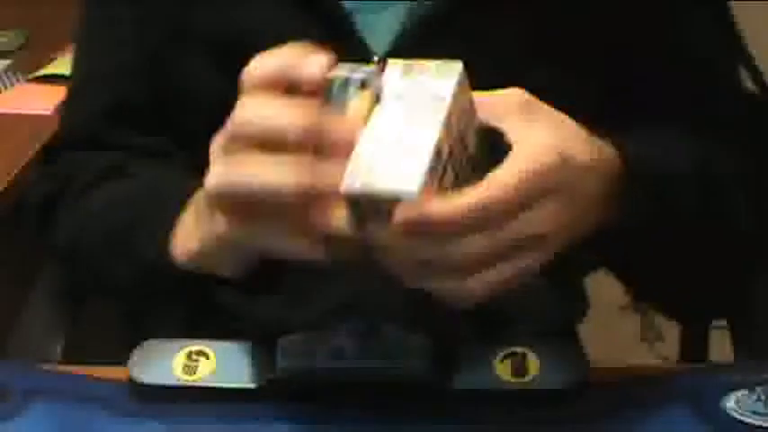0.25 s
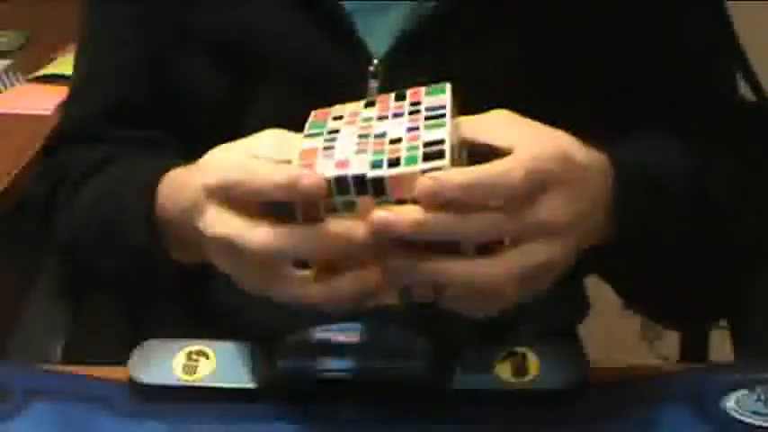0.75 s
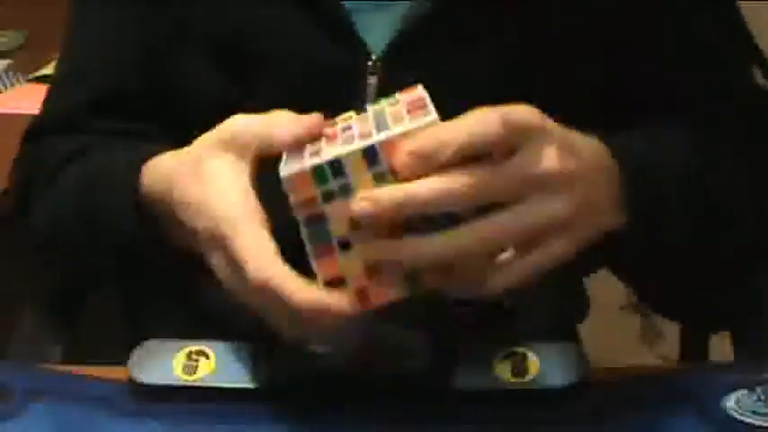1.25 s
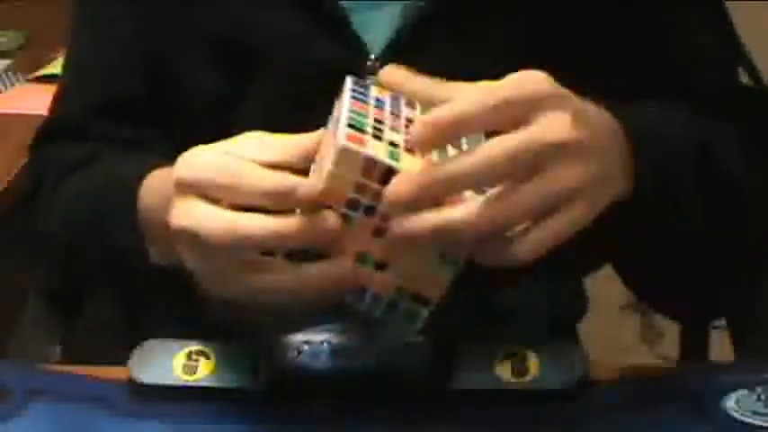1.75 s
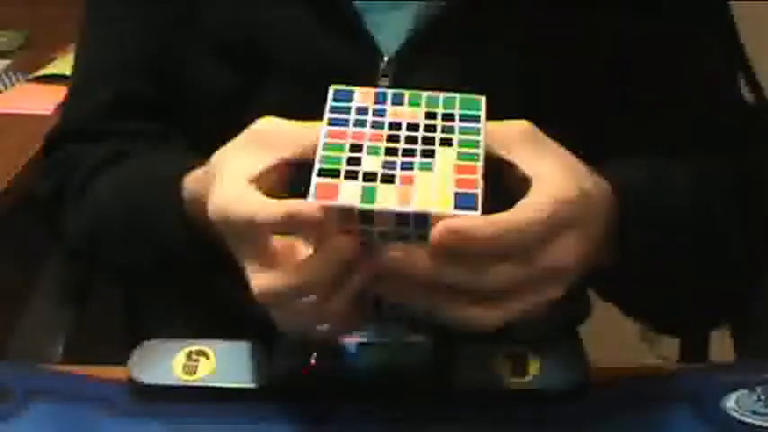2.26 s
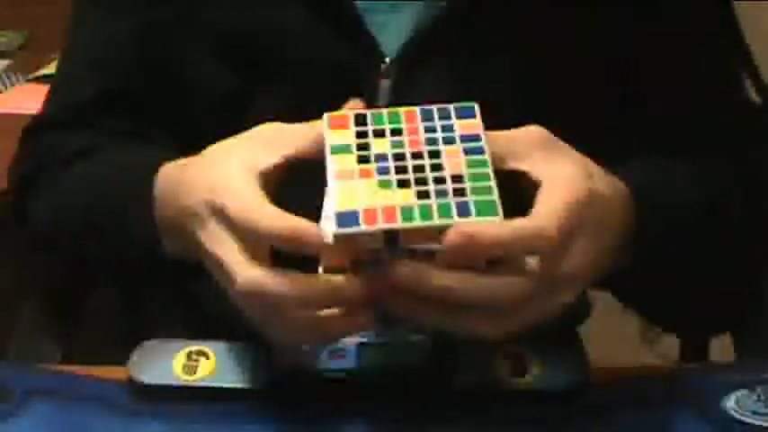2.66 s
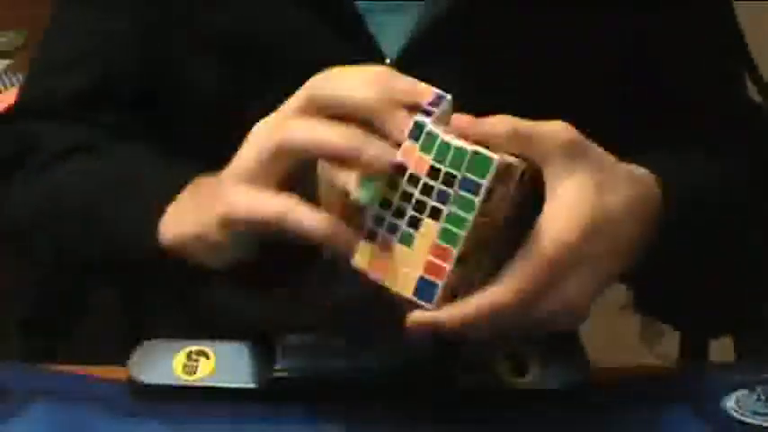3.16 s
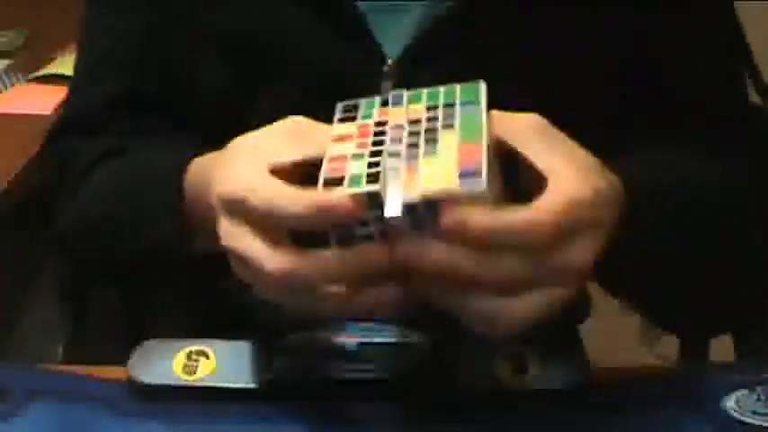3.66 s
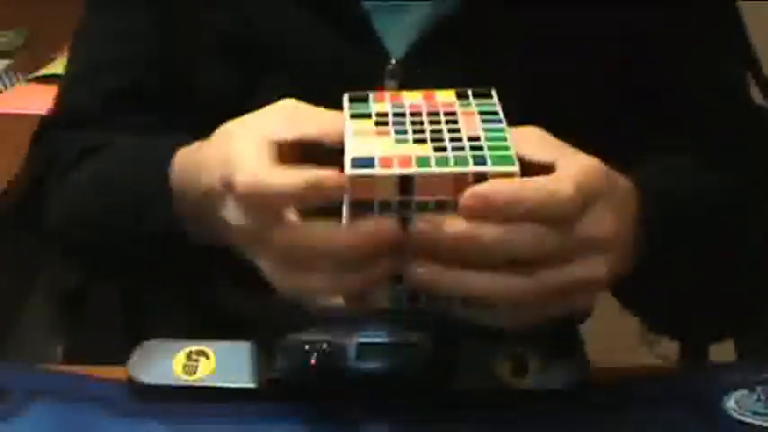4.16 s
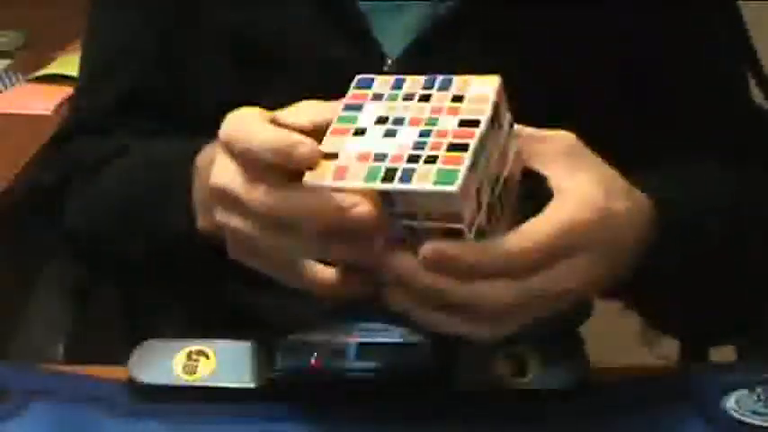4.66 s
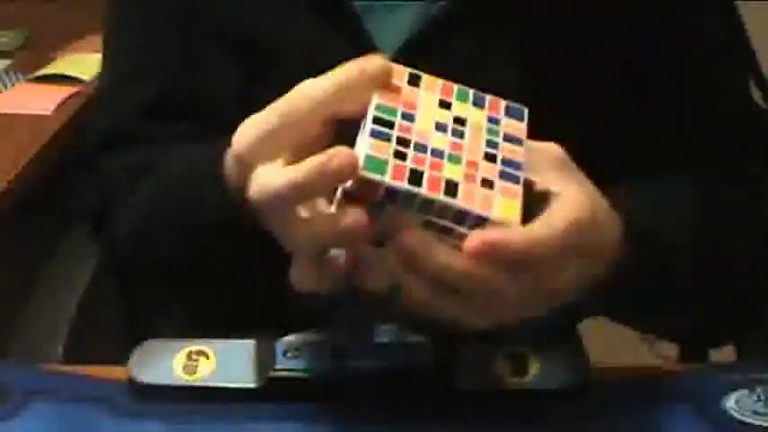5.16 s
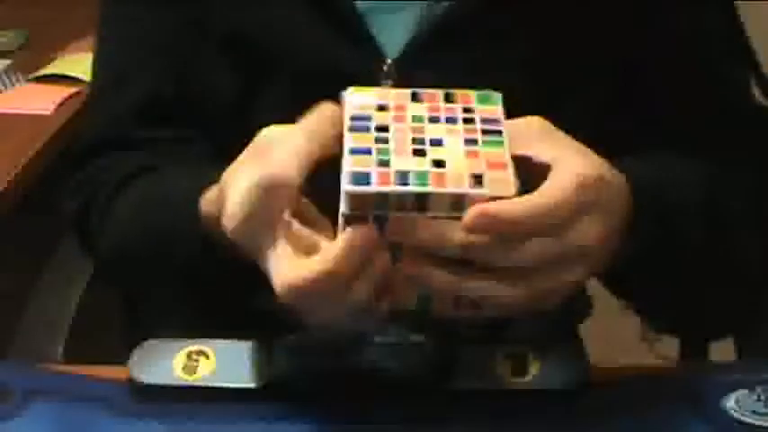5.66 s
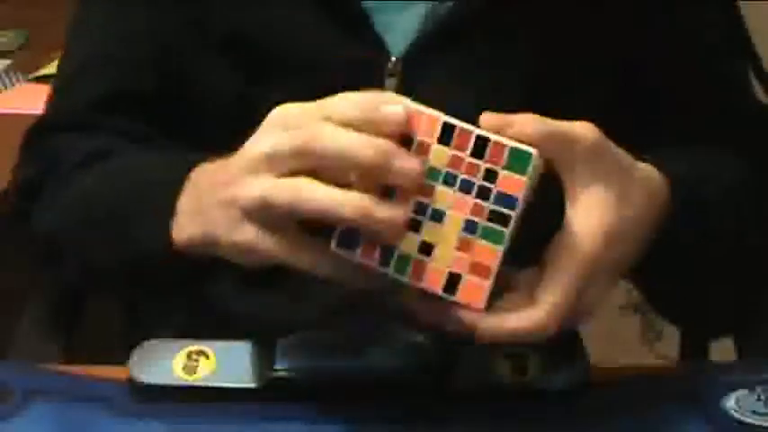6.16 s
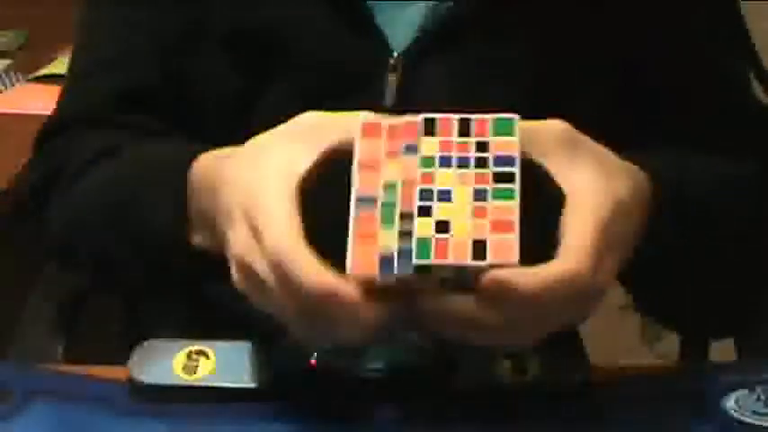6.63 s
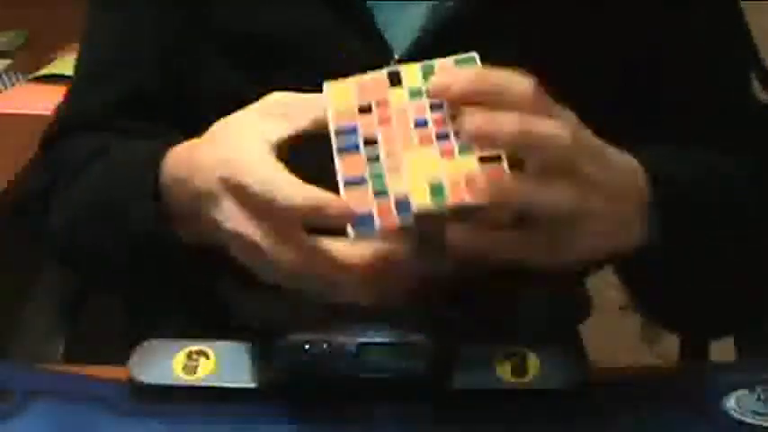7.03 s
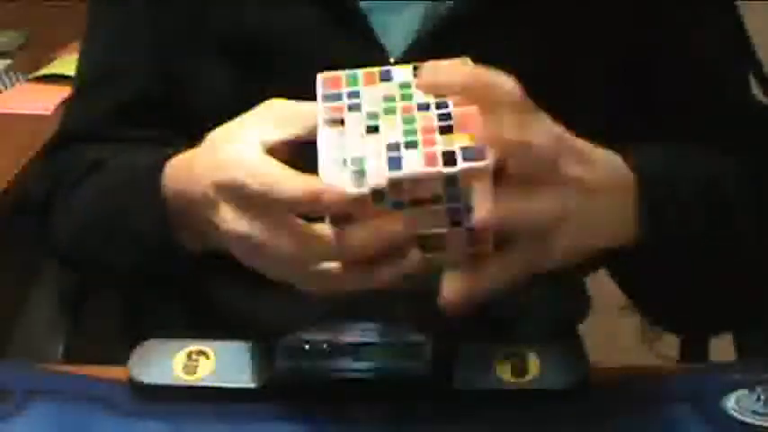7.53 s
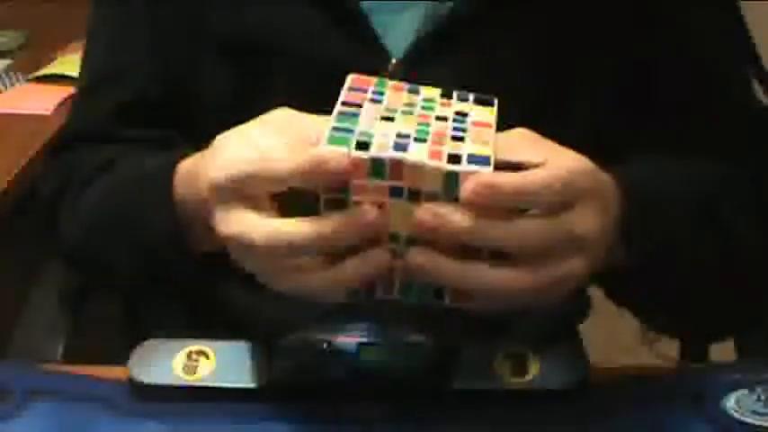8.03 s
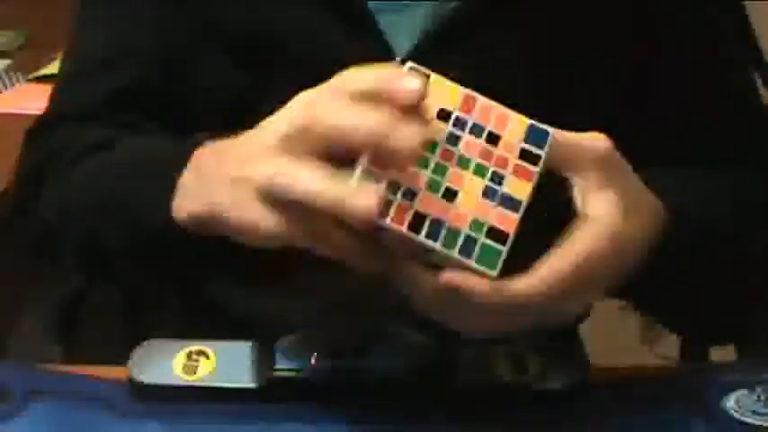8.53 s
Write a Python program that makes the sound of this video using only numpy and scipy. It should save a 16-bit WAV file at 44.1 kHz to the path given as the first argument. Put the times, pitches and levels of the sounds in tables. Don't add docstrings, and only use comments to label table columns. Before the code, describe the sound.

A quiet, softly furnished room, heard by a close small stereo microphone with steady hiss and faint mains hum. Soft, low footsteps thud through the floor from the start, fading over about five seconds. A large hollow plastic puzzle cube ticks faintly, then a loud, bright crunching turn snaps at 0.4 s. Lighter clicks follow at 0.6, 0.75 and 1.1, with sharp cracks at 1.45 and 1.65. After small nudges, turns clack at 2.5 and 2.9, then a dense run rattles from 3.2 to 3.85, strongest near 3.4. More follow at 4.05-4.5, with a crisp burst around 4.4. After a pause, hollow clacks come at 5.2, 5.55 and 5.8, then 6.35-6.75. From 6.8 to 8.4 only tiny ticks and faint creaks remain. Two last short, snappy turns sound at 8.47 and 8.75, dry and close.

```python
import sys
import numpy as np
from scipy import signal
from scipy.fft import rfft, irfft, next_fast_len
from scipy.io import wavfile
from scipy.ndimage import uniform_filter1d

SR = 44100
rng = np.random.default_rng(int(sys.argv[2]) if len(sys.argv) > 2 else 0)


def how_loud(loudness_db):
    steps = np.asarray(loudness_db, float) / 20
    return 10 ** steps


def wav_record(signal):
    frames = np.transpose(np.atleast_2d(signal))
    bounded = np.clip(frames, -1, 1)
    quanta = np.round(bounded * 32767).astype(np.int16)
    wavfile.write(sys.argv[1], SR, quanta)


N = 387638

# frequency [Hz], level [dB per Hz].
PLASTIC = [(650, -46), (1100, -17), (1740, 0), (1880, -4), (2230, -5.5), (3610, -1.5), (7720, -3),
           (10800, -2.5), (13400, -1), (16000, -27)]
# frequency [Hz], width [Hz], level [dB].
HOLLOW = [(400, 64, -22), (607, 63, -0.5), (708, 116, 6), (825, 33, -1)]
GRIP_DB = 3.0
EDGES_HZ = 1100 * 2 ** (np.arange(13) / 3.1)
BAND_HZ = np.sqrt(EDGES_HZ[1:] * EDGES_HZ[:-1])
COARSE_S = np.arange(0, N + 44, 44) / SR


def rms_one(x):
    return x / np.sqrt(np.mean(x ** 2) + 1e-20)


def at_hz(points, hz):
    return np.interp(np.log(hz), np.log(np.array(points)[:, 0]), np.array(points)[:, 1])


def band(x, low_hz, high_hz):
    return signal.sosfilt(signal.butter(2, [low_hz, high_hz], "band", fs=SR, output="sos"), x + 1e-18)


def full_rate(coarse):
    return np.interp(np.arange(N) / SR, COARSE_S, coarse)


def drift(rate_hz):
    r = np.exp(-80 * np.pi * rate_hz / SR)
    coarse = rng.standard_normal(N // 40 + 2002)
    slow = signal.lfilter([1], [1, -2 * r, r * r], coarse)[2000:]
    return np.interp(np.arange(N) / 40, np.arange(len(slow)), rms_one(slow))


def dying(clicks, t60_s):
    return signal.lfilter([1], [1, -how_loud(-60 / (t60_s * SR))], clicks + 1e-18)


def turning():
    # start [s], end [s], level [dB], treble share [dB].
    turns = [(0.36, 0.456, -23, -4), (0.561, 0.618, -36.5, -9), (0.728, 0.785, -37.5, -8.5),
             (1.056, 1.16, -34, -8), (1.445, 1.54, -35, -6.5), (1.64, 1.655, -20.5, -4.5),
             (1.841, 1.876, -40.5, -3.5), (2.467, 2.531, -33, -9.5), (2.874, 2.923, -28.5, -8),
             (3.195, 3.271, -29.5, -5.5), (3.343, 3.413, -24, -7.5), (3.415, 3.468, -25, -2.5),
             (3.583, 3.624, -34, -1.5), (3.668, 3.709, -36.5, -8.5), (3.785, 3.856, -31.5, -3.5),
             (4.044, 4.066, -31.5, -7.5), (4.12, 4.205, -28.5, -6), (4.262, 4.309, -45.5, -6),
             (4.356, 4.434, -22, -2), (4.436, 4.489, -32, -5.5), (5.169, 5.221, -24, -5.5),
             (5.539, 5.616, -27, -5), (5.645, 5.668, -37.5, -5), (5.758, 5.819, -27.5, -4.5),
             (6.348, 6.394, -36, -5.5), (6.483, 6.562, -26, -5), (6.676, 6.724, -34.5, -6),
             (6.74, 6.761, -22.5, -4), (8.462, 8.509, -26, -5), (8.741, 8.803, -24.5, -4)]
    # start [s], end [s], level [dB], treble share [dB].
    nudges = [(-0.1, 0.029, -42.5, -9), (0.131, 0.207, -47.5, -8), (0.225, 0.269, -42.5, -5),
              (0.707, 0.728, -39.5, -8), (0.894, 0.942, -51.5, -11), (0.958, 1.034, -44, -8),
              (1.23, 1.246, -39, -5.5), (1.398, 1.428, -40, -5.5), (1.918, 2.01, -53, -7),
              (2.045, 2.064, -39.5, -6.5), (2.118, 2.139, -46.5, -5), (2.312, 2.333, -52.5, -9),
              (2.437, 2.474, -42, -10), (2.618, 2.662, -44, -3), (2.774, 2.82, -54.5, -9),
              (3.321, 3.35, -32, -1), (3.918, 3.975, -46.5, -13), (4.664, 4.735, -57.5, -9),
              (5.518, 5.546, -38, -11), (5.905, 5.946, -42, 0), (6.022, 6.1, -55.5, -2),
              (7.051, 7.071, -54, -15), (7.126, 7.141, -48, -19.5), (7.175, 7.19, -48, -7),
              (7.294, 7.363, -58.5, -11), (7.533, 7.626, -59.5, -8), (7.644, 7.702, -46.5, -5.5),
              (7.823, 7.827, -61, 1), (7.932, 7.982, -51, -14), (8.188, 8.206, -52.5, -11),
              (8.289, 8.312, -44.5, -7), (8.43, 8.468, -38.5, -6)]
    start, end, level_db, bright_db = np.transpose(turns + nudges)[:, :, None]
    fade_db = np.repeat([0.5, 4], [len(turns), len(nudges)])[:, None]
    knock_db = -14.5 - 0.72 * bright_db
    t = COARSE_S
    held_db = level_db - fade_db * np.clip(2 * (t - start) / (end - start) - 1, -1, 1)
    early_s = np.maximum(start + 0.0079 - t, 0)
    late_s = np.maximum(t - end + 0.01, 0)
    power = how_loud(2 * (held_db - 1000 * early_s - 880 * late_s))
    power += how_loud(2 * (held_db - 15 - 370 * early_s - 95 * late_s))
    total = power.sum(axis=0) + 1e-12
    gain = np.sqrt(total)
    knock = np.sqrt((power * how_loud(2 * knock_db)).sum(axis=0))
    bright = (power * bright_db).sum(axis=0) / total
    return [full_rate(c) for c in (gain, knock, bright)]


def hollow(strikes):
    out = 0
    for x, (hz, width_hz, level_db) in zip(strikes, HOLLOW):
        r = np.exp(-np.pi * width_hz / SR)
        b = (1 - r * r) / 2 * np.array([1, 0, -1])
        a = [1, -2 * r * np.cos(2 * np.pi * hz / SR), r * r]
        out = out + how_loud(level_db) * signal.lfilter(b, a, x + 1e-18)
    return band(out, 456, 970)


def rattle(gain, knock, bright_db):
    contacts_per_s = 1600
    born = np.flatnonzero(rng.random(N) < contacts_per_s * how_loud(1.8 * drift(40)) / SR)
    size_db = 1.4 * np.minimum(rng.exponential(1, len(born)), 3)
    white, out = rng.standard_normal((2, N)), 0
    for k, (low, high) in enumerate(zip(EDGES_HZ, EDGES_HZ[1:])):
        clicks = np.zeros(N)
        clicks[born] = how_loud(size_db + rng.normal(0, 2.6, len(born)))
        puff = band(dying(clicks, .006) * white[k % 2], low, high)
        tilt = np.clip(np.log2(low / 6000) / 1.4, -1, 1) * 0.94
        out = out + how_loud(at_hz(PLASTIC, BAND_HZ[k]) + tilt * (bright_db + 1.0)) * puff
    out = out / (uniform_filter1d(out ** 2, size=500) + 1e-12) ** 0.11

    clicks = np.zeros(N)
    clicks[born] = how_loud(size_db) * rng.choice([-1, 1], len(born))
    shell = rms_one(hollow([clicks * how_loud(GRIP_DB * drift(8.8)) for _ in HOLLOW]))
    return how_loud(-1.0) * gain * rms_one(out) + how_loud(-1.5) * knock * shell


def crack(clicks, buzz):
    sharp = signal.lfilter([.13], [1, -.87], dying(clicks, .0055))
    return how_loud(1.5) * sharp + how_loud(-12.5) * dying(buzz, 0.058)


def snaps(rows):
    s, peak_db, hz, knock_db = np.transpose(rows)
    at, out = (s * SR).astype(int), 0
    jolt = rng.choice([-1., 1.], (2, N))
    spike = how_loud(6.5) * np.roll(jolt[1], 1)

    octaves = np.log2(BAND_HZ / hz[:, None])
    near_db = 4.7 * np.exp(-(octaves / 0.18) ** 2)
    near_db -= 4.0 * np.abs(octaves) + 2.5 * np.maximum(octaves, 0)
    share = how_loud(at_hz(PLASTIC, BAND_HZ) + near_db + rng.normal(0, 0.62, near_db.shape))
    share /= np.sqrt((share ** 2 * np.diff(EDGES_HZ) / SR * 2).sum(axis=1))[:, None]

    for k, (low, high) in enumerate(zip(EDGES_HZ, EDGES_HZ[1:])):
        clicks, buzz = np.zeros((2, N))
        clicks[at] = how_loud(peak_db - 4.0) * share[:, k]
        buzz[at] = clicks[at] * how_loud(0.21 * near_db[:, k])
        burst = crack(clicks, buzz) * jolt[k % 2] + (-1) ** k * spike * clicks
        out = out + band(burst, low, high)

    lead = int(.0015 * SR)
    grip_db = GRIP_DB * rng.standard_normal((len(HOLLOW), len(s)))
    strikes = np.zeros((len(HOLLOW), N))
    strikes[:, at - lead] = how_loud(knock_db + 23.0 + grip_db) * jolt[0, at]
    return out + hollow(strikes)


def snapping_pieces(gain, knock):
    # time [s], peak [dB], brightest [Hz], hollow knock [dB].
    small = [(0.3591, -11, 10800.0, -40), (0.3699, -10, 9200.0, -33), (0.3785, -7.5, 12000.0, -33),
             (0.4212, -10, 10900.0, -32), (0.4279, -15, 8900.0, -38), (0.5771, -13.5, 8400, -47),
             (0.9025, -20, 13000, -65), (1.0682, -12.5, 11200, -23), (1.4564, -6.5, 11500, -61),
             (1.474, -12, 11500, -42), (1.5, -8, 10700, -41), (1.6374, -4, 10800, -24),
             (1.6445, -8.5, 9200.0, -23.5), (1.6574, -22, 11000.0, -37), (2.8792, -12.5, 9700, -21),
             (3.1974, -14.5, 8200, -30), (3.2243, -10.5, 8500, -26), (3.2559, -18, 11300.0, -34),
             (3.3417, -5.5, 8700, -43), (3.3519, -15, 11300.0, -28), (3.3564, -10, 10900.0, -23),
             (3.3717, -7.5, 10600.0, -27), (3.376, -8, 11400.0, -33), (3.3903, -13, 11000.0, -22),
             (3.3941, -11, 9800.0, -35.0), (3.4262, -19, 8900.0, -30), (3.4326, -12, 11400.0, -41),
             (3.4502, -11, 9700, -31), (3.6115, -16.5, 8000, -40), (3.7618, -8.5, 10800, -38),
             (3.8017, -19, 11500.0, -48), (4.3681, -10.5, 9170, -36), (4.3752, -10, 10800.0, -38),
             (4.3812, -10, 10400.0, -22), (4.3964, -8, 11800.0, -41), (4.4016, -11, 11700.0, -36),
             (4.4155, -7.5, 9000.0, -31), (4.4281, -12, 11600.0, -43), (5.1916, -7, 9600, -20),
             (5.5449, -12.5, 8250, -32), (5.772, -20, 8200.0, -20.5), (6.3791, -21.5, 9000, -50.0),
             (6.4635, -19, 8700, -39), (6.5106, -6, 10700, -19), (6.5268, -15.0, 9300.0, -22),
             (6.5776, -16, 9700, -33), (6.7506, -7.5, 9900, -33), (8.7592, -11, 11100, -37),
             (8.7636, -9, 9700, -16.5), (8.7795, -18, 12900.0, -41)]
    # time [s], peak [dB], brightest [Hz], hollow knock [dB].
    large = [(0.387, -9, 3300.0, -28), (0.3907, -16, 7400.0, -26), (0.3975, -16, 3900.0, -22.0),
             (0.4033, -8.5, 5000.0, -41), (0.409, -12.5, 4000.0, -35), (0.4413, -14, 6700, -19),
             (0.5984, -16, 2900, -27), (0.747, -15, 2780, -35), (1.1125, -16, 5740, -38),
             (1.2284, -15, 6850, -52), (1.4825, -16.5, 3500.0, -36), (1.6268, -18, 2900.0, -25),
             (2.4734, -18, 6100.0, -39), (2.4846, -13, 4300.0, -17), (2.4927, -14, 5000.0, -25),
             (2.5028, -9, 5300, -24), (2.5072, -29, 3500.0, -22), (2.89, -9.5, 5600.0, -23),
             (2.8961, -11.5, 3940, -31), (2.9065, -14, 3000.0, -20.5), (2.911, -20, 2780, -29.5),
             (3.234, -11, 8200, -35.0), (3.365, -9, 4200, -26), (3.4362, -13, 5760, -25),
             (3.4556, -27, 6000.0, -37), (4.133, -15, 2880, -32), (4.1564, -17.5, 7000.0, -31),
             (4.1718, -14, 7000, -31), (4.2531, -14.5, 6360, -40), (4.404, -12, 4000.0, -32),
             (5.1832, -8.5, 3100.0, -25), (5.1974, -13, 5870, -30), (5.2059, -10.5, 5800.0, -19.5),
             (5.2119, -14.5, 3000.0, -24), (5.5554, -11.5, 2920, -23.5), (5.5622, -7.5, 4070, -17),
             (5.569, -9.5, 6300, -21), (5.5778, -14, 6400, -15.5), (5.6549, -17.5, 7300, -37),
             (5.78, -14.5, 4270, -18), (5.7867, -12, 5670, -22), (5.7947, -14, 6100, -19),
             (6.4912, -9, 4000, -16), (6.7044, -19, 4600.0, -42), (6.7609, -8, 8400, -21.5),
             (8.47, -6.5, 6100, -39), (8.4779, -10, 4360, -30.0), (8.4848, -12, 5500, -29.0),
             (8.4896, -33, 4100.0, -29), (8.4954, -25, 5500.0, -26)]
    # time [s], peak [dB], brightest
    # [Hz].
    ticks = [(0.0052, -29.5, 8400), (0.1397, -21.5, 8040), (0.235, -23, 9700.0), (0.34, -22.5, 10600),
             (0.7736, -21, 8500.0), (0.969, -28.5, 7600.0), (1.148, -22, 6300.0), (1.241, -33, 6200.0),
             (1.4678, -33, 10900.0), (1.479, -26, 10600.0), (1.4897, -28, 10900.0), (1.5113, -21, 11800.0),
             (1.516, -21, 7800.0), (1.526, -18, 7100.0), (1.7443, -32, 7000.0), (1.8385, -22.5, 6100.0),
             (1.95, -26, 7700), (2.048, -18, 9500), (3.2117, -17, 7100.0), (3.2152, -15, 6700.0),
             (3.2447, -14.5, 10000), (3.304, -22.5, 8400), (3.3103, -30, 8300.0), (3.3328, -20, 9400.0),
             (3.411, -22, 12100.0), (3.6052, -19.5, 10000), (3.7869, -27.5, 11300.0), (3.8301, -16.5, 8900.0),
             (3.839, -18, 11000.0), (3.9204, -23, 11000), (3.939, -28, 10600.0), (4.0471, -17.5, 9000.0),
             (4.0577, -25, 8100.0), (4.1227, -31, 7200.0), (4.149, -13, 6500.0), (4.3479, -40, 8250),
             (4.46, -22, 9600.0), (4.4802, -19.5, 9400.0), (5.169, -20, 7800.0), (5.599, -13.5, 6270),
             (5.647, -26, 10500.0), (5.9017, -19, 5870), (5.9142, -19.5, 9500), (6.301, -32, 6900),
             (6.335, -29, 10900.0), (6.3564, -20, 13100.0), (6.3745, -15.5, 9300.0), (6.4701, -23, 11600.0),
             (6.481, -21, 10900.0), (6.548, -19, 9600.0), (6.57, -24, 6000.0), (6.696, -22, 12100.0),
             (7.6053, -31.5, 10500), (7.66, -24.5, 10500), (7.9608, -28.5, 8900.0), (8.3691, -24.5, 10200),
             (8.4284, -30, 6500.0), (8.4334, -30, 9600.0), (8.4411, -27.0, 7200.0), (8.732, -26, 5800.0),
             (0.162, -31, 3400.0), (0.256, -33, 3400.0), (0.465, -21.5, 2090), (0.5672, -20, 3100.0),
               (0.585, -26, 3100.0), (0.5923, -20, 3400), (0.7322, -29.0, 4100.0), (0.8901, -26.5, 5630),
               (0.9806, -25.5, 3600.0), (1.042, -29, 1790), (1.0735, -12.5, 4270), (1.085, -16, 4700.0),
               (1.097, -29, 4100.0), (1.134, -29, 5500.0), (1.138, -30, 2400.0), (1.4041, -48, 5600.0),
               (1.4486, -27.0, 3700.0), (1.8562, -29, 5800.0), (1.909, -20, 3700), (2.1265, -33, 2800.0),
               (2.4378, -28, 4000.0), (2.4595, -27, 3000.0), (2.4639, -21, 3800.0), (2.627, -38, 3300.0),
               (2.926, -33, 1900.0), (3.191, -26, 4300.0), (3.3191, -24, 4600.0), (3.578, -29.5, 3800.0),
               (3.591, -32, 3100.0), (3.676, -23, 3200.0), (3.7, -29, 1800.0), (3.8455, -30, 5700.0),
               (3.849, -27, 2800.0), (3.936, -24, 3380), (4.108, -25.5, 2900.0), (4.1268, -37, 3300.0),
               (4.1663, -20, 4030), (4.1787, -28, 4100.0), (4.186, -21, 3300.0), (4.198, -19.5, 3200.0),
               (4.358, -13.5, 3500.0), (4.4389, -20, 4100.0), (4.709, -29, 3740), (5.5236, -26.5, 5470),
               (5.5317, -29, 4000.0), (5.739, -25.5, 2900.0), (5.76, -23, 3800.0), (6.6887, -26, 5300.0),
               (6.7112, -29, 3400.0), (6.73, -32, 3400.0), (7.127, -28, 1790), (7.6507, -35, 3100.0),
               (7.669, -33, 5140), (7.8058, -29.5, 3800.0), (8.4467, -22, 5100.0), (8.4571, -15.5, 4150),
               (8.5292, -27.5, 3100.0), (8.72, -30, 4400.0), (8.7264, -34, 3400.0), (8.7725, -23, 5500.0),
             (0.128, -36, 3400.0), (0.1801, -27, 1890), (0.2214, -39, 9800.0), (0.5393, -36.5, 8300),
              (0.715, -41, 3730), (1.2684, -31, 2590), (1.381, -37, 5200), (1.6184, -37, 2900.0),
              (1.7606, -35, 7600), (1.7985, -30, 3380), (1.8257, -42, 4060), (1.8913, -37, 5600.0),
              (2.785, -40, 6000.0), (2.1775, -41.5, 3800.0), (2.3148, -31, 4450), (2.6168, -43, 2930),
              (2.6455, -36, 6280), (3.073, -37.5, 3020), (3.167, -40, 9800.0), (3.6531, -34, 11100.0),
              (3.7495, -39.0, 3700.0), (3.9675, -36, 4400.0), (4.0334, -32, 5700.0), (4.326, -44, 3800.0),
              (4.5203, -39, 4500.0), (4.5782, -37, 6660), (4.8104, -38, 3880), (4.945, -44, 5700.0),
              (5.0766, -32.5, 3460), (5.4642, -32.5, 4000.0), (6.1775, -43, 3400.0), (6.311, -32, 7500.0),
              (6.3262, -31, 9800.0), (6.863, -31, 1770), (6.883, -31.5, 2110), (7.06, -43, 6600.0),
              (7.111, -35, 3000.0), (7.1779, -31, 2170), (7.2306, -44.5, 7800.0), (7.251, -42, 3400.0),
              (7.3227, -33, 2850), (7.441, -36, 3600.0), (7.541, -34.5, 2100.0), (7.5538, -38, 8600.0),
              (7.5801, -36.5, 5900.0), (7.612, -33.5, 3100.0), (7.6424, -38.0, 2600.0),
              (7.7515, -36, 2900.0), (7.758, -39, 6100.0), (7.8182, -35, 1780), (7.9318, -37, 6000.0),
              (7.939, -40, 3400.0), (7.952, -30, 3500.0), (8.2805, -42, 4000.0), (8.2885, -37, 3900.0),
              (8.295, -33.5, 3600.0),
             (0.3555, -12.5, 8400), (0.3668, -12, 9000), (6.461, -26, 8700), (1.416, -30, 10500),
             (4.1308, -13, 5800), (4.273, -37, 9500), (4.285, -33, 10500), (4.601, -36, 3600),
             (8.192, -40, 2800), (8.12, -45, 3700)]
    follows_db = 20 * np.log10(knock / gain + 1e-9) - 8.0
    light = [(s, db, hz, db + follows_db[int(s * SR)]) for s, db, hz in ticks]
    return snaps(small + large + light)


def ports(x, jump_db=-26.0, shade_db=-13.0):
    shade = rng.standard_normal(1600) * dying(np.arange(1600) == 0, .05)
    shade = shade / np.sqrt(np.sum(shade ** 2))
    side = how_loud(jump_db) * drift(340.0) * x
    side = side + how_loud(shade_db) * signal.fftconvolve(x, shade)[:N]
    return x + side * np.array([[1], [-1]])


def room(x):
    t60_s, wall_cut_hz = 0.43, 10600
    size = next_fast_len(N + SR)
    w = 2 * np.pi * np.arange(size // 2 + 1) / size
    dull = 1 / (1 + 1j * w * SR / (2 * np.pi * wall_cut_hz))
    sides = np.zeros((2, len(w)), complex)
    for k, lag in enumerate(rng.uniform(.006, 0.026, 16) * SR):
        loop = how_loud(-60 * lag / SR / t60_s) * dull * np.exp(-1j * w * lag)
        sides[k % 2] += (-1) ** (k // 2) * loop / (1 - loop)
    return irfft(sides * rfft(x, size), size)[:, :N]


def room_tail(cube):
    left, right = room(cube - 0.9 * band(cube, 467, 900))
    return how_loud(-24.0) * (left + how_loud(-4.0) * right * np.array([[1], [-1]]))


def coloured(spectrum, low_hz, count, patchy_db, per_octave):
    # frequency [Hz], left-right likeness [0..1].
    likeness = [(40, .998), (150, 0.93), (300, 0.16), (2000, 0.081), (12000, 0.69)]
    out, edges = 0, low_hz * 2 ** (np.arange(count + 1) / per_octave)
    white = rng.standard_normal((2, 2, N + SR))
    for k, (low, high) in enumerate(zip(edges, edges[1:])):
        centre_hz = np.sqrt(low * high)
        mid, side = band(white[k % 2], low, high)[:, SR:]
        alike = np.clip(at_hz(likeness, centre_hz), -1, 1)
        gain = how_loud(at_hz(spectrum, centre_hz) + patchy_db * drift(5.2))
        out = out + gain * (np.sqrt(1 + alike) * mid + np.sqrt(1 - alike) * side * [[1], [-1]])
    return rms_one(out)


def footfalls():
    # time [s], weight held [s], level [dB], board creak over thud [dB].
    steps = [(.03, 0.07, -44.5, 3), (.25, 0.064, -52.5, 8.5), (.76, 0.04, -43.5, -3), (1.08, .03, -49, -17),
             (1.33, 0.14, -44.5, -2), (2.02, 0.083, -49, 3), (2.59, 0.13, -47.5, -4.5),
             (3.41, 0.051, -55, 9), (3.8, 0.11, -63, 12), (4.04, 0.21, -56.5, -1), (4.98, 0.088, -62, 7),
             (5.431, 0.045, -50.5, -22)]
    rise_db_per_s, fall_db_per_s, house_db = 298, 48, -63
    s, held_s, level_db, upper_db = np.transpose(steps)[:, :, None]
    before_s = np.maximum(s - COARSE_S, 0)
    after_s = np.maximum(COARSE_S - s - held_s, 0)
    power = how_loud(2 * (level_db - rise_db_per_s * before_s - fall_db_per_s * after_s))
    both = power, power * how_loud(2 * upper_db)
    return [full_rate(np.sqrt(p.sum(axis=0) + how_loud(2 * house_db))) for p in both]


def footsteps():
    # frequency [Hz], level [dB per Hz].
    floorboards = [(20, 3.5), (70, -2), (107, 4.5), (128, 3.5), (145, -16), (188, 2.5), (249, -9),
                   (311, -10.5), (330, -19)]
    thud_top_hz = 155
    floor = coloured(floorboards, low_hz=25.53, count=15, patchy_db=2.5, per_octave=4)
    thud = signal.sosfilt(signal.butter(2, thud_top_hz, fs=SR, output="sos"), floor)
    boards = signal.sosfilt(signal.butter(2, thud_top_hz, "high", fs=SR, output="sos"), floor)
    thud_gain, boards_gain = footfalls()
    steps = thud_gain * thud - boards_gain * boards
    return .6 * steps.mean(axis=0) + .4 * steps


def hum():
    # frequency [Hz], level [dB rms].
    harmonics = [(120, -64), (180, -63), (240, -71)]
    t, out = np.arange(N) / SR, 0
    for k, (hz, level_db) in enumerate(harmonics):
        out = out + how_loud(level_db + 1.5 + 2.8 * drift(6.2)) * np.sin(2 * np.pi * hz * t + k)
    return out


def microphone_hiss():
    # frequency [Hz], level [dB per Hz].
    hiss_colour = [(24, 12), (33, -5), (65, -12.5), (107, -4), (182, -10), (293, -6), (624, -5),
                   (1000, -13), (1480, -5), (2460, -14), (3740, -13), (4670, -16), (16000, -18)]
    hiss = how_loud(-55) * coloured(hiss_colour, low_hz=23.5, count=19, patchy_db=0.7, per_octave=2)
    return hiss + how_loud(-71.0) * band(rng.standard_normal(N), 15200, 16400)


def scene():
    gain, knock, bright_db = turning()
    cube = rattle(gain, knock, bright_db) + snapping_pieces(gain, knock)
    near = ports(cube) * how_loud(np.array([[-.15], [.15]]))
    return near + room_tail(cube) + footsteps() + hum() + microphone_hiss()


def top_cut(x):
    return signal.sosfilt(signal.butter(12, 16820, fs=SR, output="sos"), x)


def record(dry):
    cutoff_hz = 15900
    rounded = .8 * np.tanh(dry / .8)
    cut = signal.sosfilt(signal.cheby2(12, 32, cutoff_hz * 1.01, fs=SR, output="sos"), rounded)
    return top_cut(cut)


dry = scene()
out = record(dry)
wav_record(out)
```